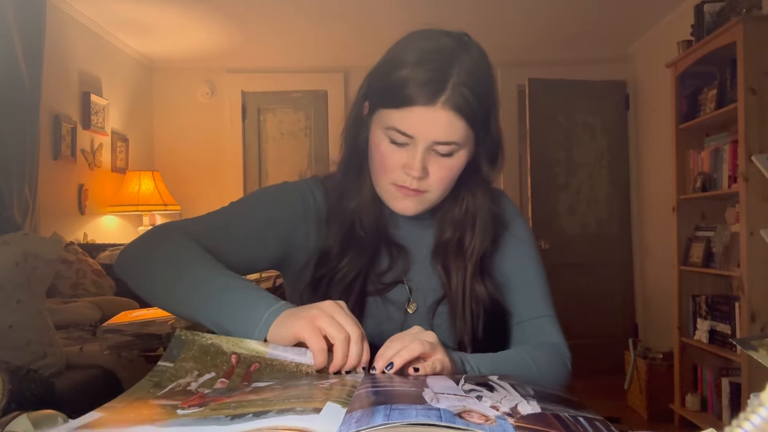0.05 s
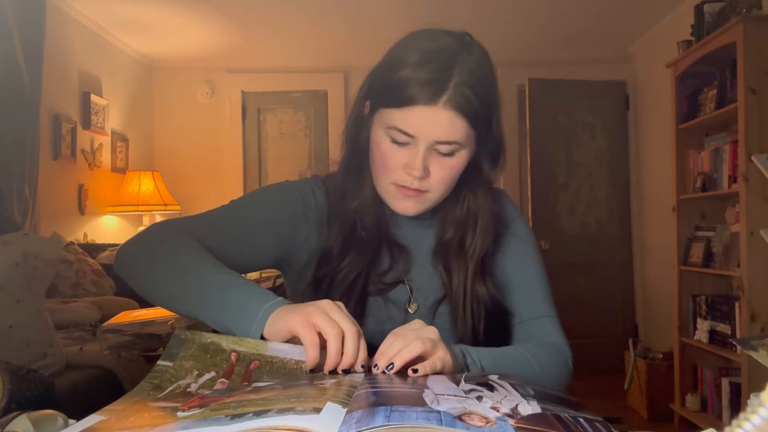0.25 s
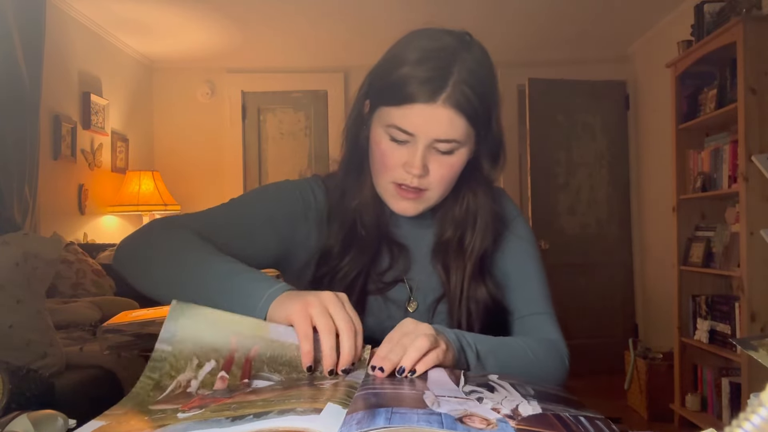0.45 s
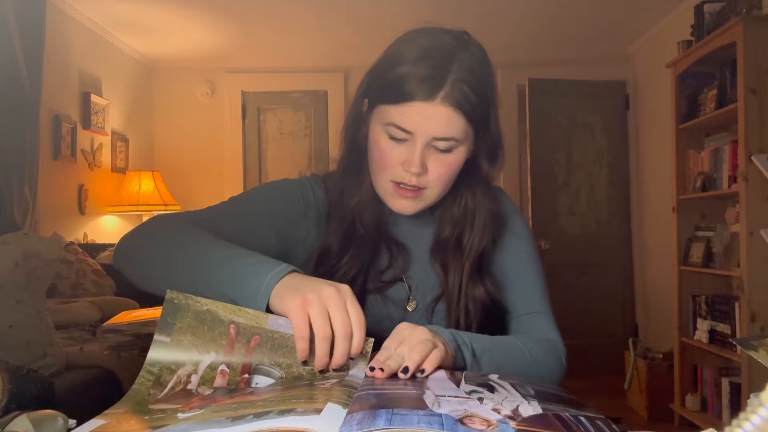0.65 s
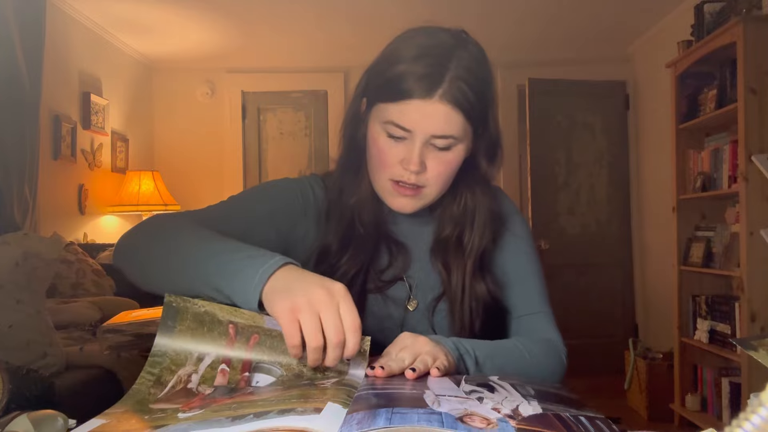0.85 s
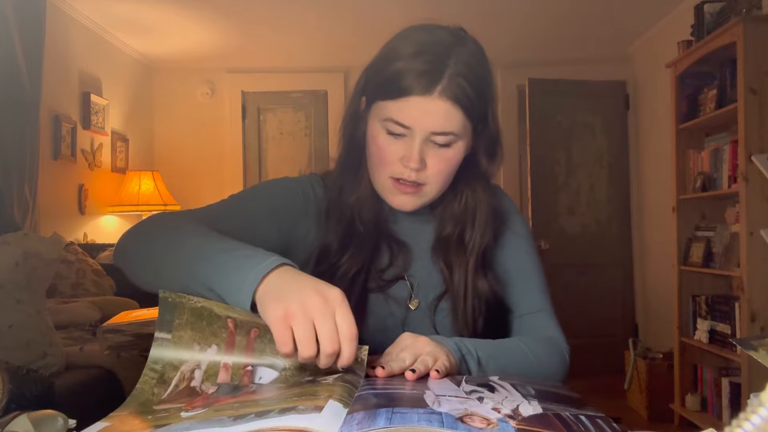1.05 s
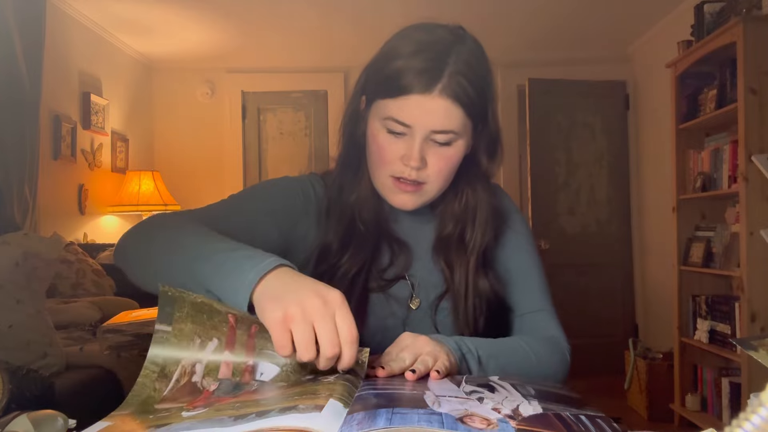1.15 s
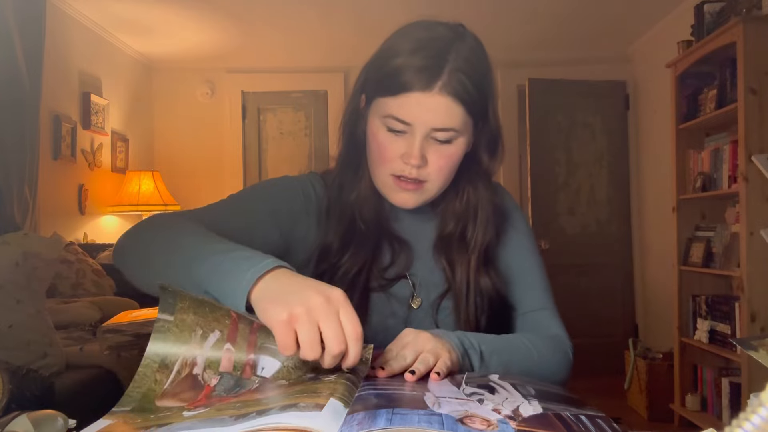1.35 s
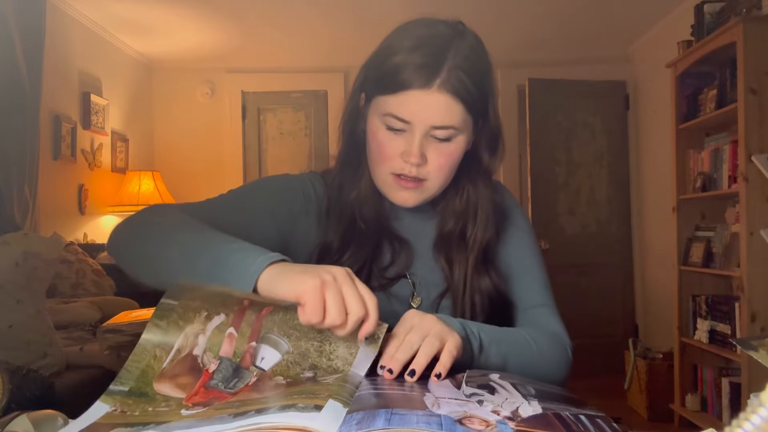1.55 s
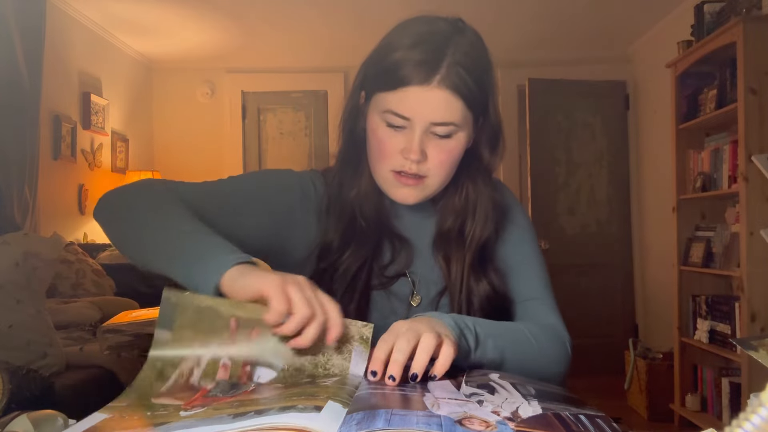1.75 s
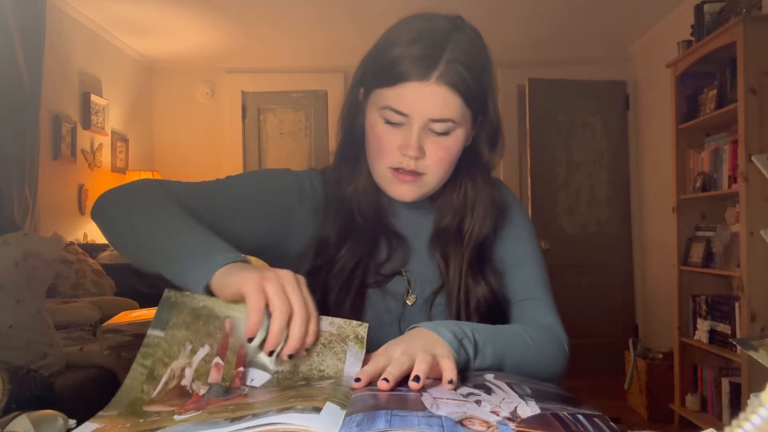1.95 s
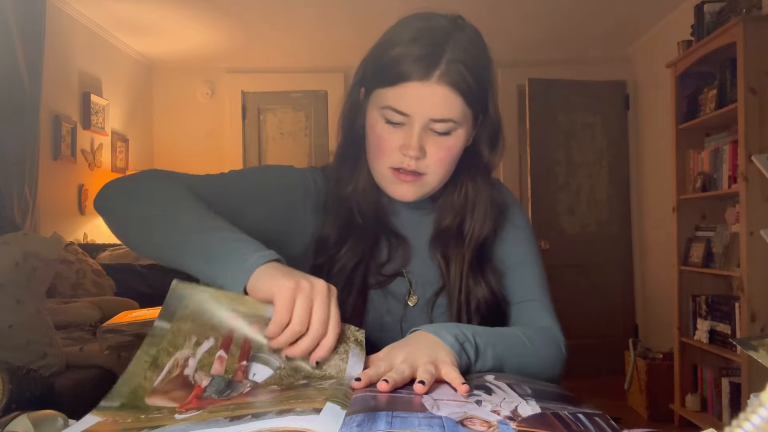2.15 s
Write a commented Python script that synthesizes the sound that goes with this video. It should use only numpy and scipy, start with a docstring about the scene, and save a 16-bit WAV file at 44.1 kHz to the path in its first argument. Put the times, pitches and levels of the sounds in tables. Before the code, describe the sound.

A glossy magazine page is torn out, then rustles and flaps softly.

```python
"""At a table in a small room, a glossy magazine page is torn out by hand.
The sheet buckles and gives in short rips, then the tear runs along the spine: each snapping fibre
is an impulse that rings the loose flap, whose resonance falls as it grows. The freed page slides
(friction noise) and flexes (bending waves) over the pages below. A short reverberation and a low
room tone lie behind it. Levels in the tables are relative, each table on its own scale."""
import sys
import numpy as np
from scipy import signal
from scipy.fft import rfft, irfft, next_fast_len
from scipy.io import wavfile
from scipy.ndimage import uniform_filter1d, map_coordinates

SR = 44100
rng = np.random.default_rng(int(sys.argv[2]) if len(sys.argv) > 2 else 0)


def output_pcm(signal):
    """Save a mono or channel-first signal as 16-bit PCM at the path in sys.argv[1].

    Samples are clipped to [-1, 1] before scaling.
    """
    pcm = np.clip(np.atleast_2d(signal).T, -1, 1) * 32767
    wavfile.write(sys.argv[1], SR, np.round(pcm).astype(np.int16))


N = 97020  # 2.2 s


def amp(db):
    """Amplitude ratio of a level in decibels."""
    return 10 ** (np.asarray(db) / 20)


def unit(x):
    """Normalisation to rms 1."""
    return x / np.sqrt(np.mean(x ** 2) + 1e-20)


def along(points, hz):
    """Interpolation of (f/Hz, value) points on a logarithmic frequency axis."""
    f, values = np.transpose(points)
    return np.interp(np.log(hz + 1), np.log(f + 1), values)


def envelopes(rows, fade_s=0.0075):
    """Amplitude envelope of each level column, dying exponentially outside the table's times."""
    times, *levels = np.transpose(rows)
    t = np.arange(N) / SR
    gate = np.exp(-np.abs(t - np.clip(t, times[0], times[-1])) / fade_s)
    return [gate * amp(np.interp(t, times, db)) for db in levels]


def filtered(x, response):
    """Linear filtering: the spectrum is multiplied by a frequency response."""
    size = next_fast_len(N + SR // 2)
    return irfft(rfft(x, size) * response(np.fft.rfftfreq(size, 1 / SR)), size)[..., :N]


def coloured(x, points, size=4096):
    """Minimum-phase filtering that conserves the power of white noise."""
    magnitude = unit(amp(along(points, np.fft.rfftfreq(size, 1 / SR))))
    cepstrum = irfft(np.log(magnitude))
    cepstrum[1:size // 2] *= 2  # folding onto positive time makes the filter causal
    cepstrum[size // 2 + 1:] = 0
    return signal.fftconvolve(x, irfft(np.exp(rfft(cepstrum))))[:N]


def split(x, edge_hz=4500):
    """Complementary crossover: the bands below and above the edge."""
    low = filtered(x, lambda hz: 1 / (1 + (hz / edge_hz) ** 10))
    return low, x - low


def wobble(per_s):
    """Smooth random modulation: a spline through per_s Gaussian values a second."""
    return map_coordinates(rng.standard_normal(int(N * per_s / SR) + 4), [np.arange(N) * per_s / SR])


def gritty(per_s, rough_db):
    """Random amplitude modulation gathers white noise into clumps."""
    return unit(rng.standard_normal(N) * amp(rough_db * wobble(per_s)))


def add(track, start_s, x):
    """Superposition of x on the track from a given time."""
    part = track[int(start_s * SR):][:len(x)]
    part += x[:len(part)]


def burst(decay_s, rise_s=0.00013, rough_db=3):
    """Acoustic emission: a cluster of tiny fractures gives exponentially decaying noise."""
    t = np.arange(SR // 10) / SR
    envelope = np.exp(-t / decay_s) * (1 - np.exp(-t / rise_s))
    clumps = amp(rough_db * unit(uniform_filter1d(rng.standard_normal(len(t)), size=24)))
    return unit(envelope * clumps * rng.standard_normal(len(t))) * np.sqrt(np.mean(envelope ** 2))


# Likeness of left and right in the room's field: f/Hz, coherence
COHERENCE = [(100, 0.85), (400, 0.49), (1500, 0.029), (4000, 0), (16000, 0)]
def diffuse(x):
    """Diffuse-field coherence: two independent signals become alike at long wavelengths."""
    angle = lambda hz: np.arccos(np.clip(along(COHERENCE, hz), -1, 1)) / 2
    mid, side = filtered(x, lambda hz: np.array([np.cos(angle(hz)), np.sin(angle(hz))]))
    return np.array([mid + side, mid - side])


# Spectrum of the background: f/Hz, level/dB
ROOM_TONE = [(20, -43), (32, 2.5), (42, 1.5), (65, -7), (110, -8), (200, -19.5), (400, -17), (1000, -35),
             (4000, -31.5), (16000, -91)]
def room_tone():
    """Ambient noise: a steady diffuse field, strongest in the bass."""
    noise = diffuse(rng.standard_normal((2, N)))
    return unit(filtered(noise, lambda hz: amp(along(ROOM_TONE, hz))))


# Reverberation time of the furnished room: f/Hz, T60/s
ROOM_T60 = [(150, 0.39), (500, 0.15), (1200, 0.18), (4000, 0.24), (14000, 0.12)]
# Colour of the reflections: f/Hz, gain/dB
ROOM_COLOUR = [(100, -4), (500, -2), (1200, 1.5), (3000, 3), (16000, 1)]
def reverberation(x, first_wall_s=0.0041, gain_db=-10.5):
    """Reflections decay exponentially; the impulse response changes as the page moves."""
    wet, t = np.zeros((2, N)), np.arange(N) / SR
    moments, step_s = np.linspace(0, N / SR, num=12, retstep=True)
    for moment in moments:
        hz, age, spectra = signal.stft(rng.standard_normal((2, SR // 2)), SR, nperseg=256)
        decay = amp(-60 * age / along(ROOM_T60, hz)[:, None])
        tail = signal.istft(spectra * decay, SR, nperseg=256)[1]
        tail *= np.arange(tail.shape[1]) / SR > first_wall_s
        crossfade = np.sqrt(np.clip(1 - np.abs(t - moment) / step_s, 0, 1))
        wet += signal.fftconvolve((crossfade * x)[None], tail / np.linalg.norm(tail[0]), axes=1)[:, :N]
    return amp(gain_db) * diffuse(filtered(wet, lambda hz: amp(along(ROOM_COLOUR, hz))))


# Share of the sound that wanders between the channels: f/Hz, level/dB
SCATTER = [(100, -37), (600, -6.5), (1500, -15.5), (2800, 0), (5000, -7.5), (8000, -5.5), (16000, -24)]
# Lead of the left channel over the right: f/Hz, phase/rad
LEFT_LEAD = [(100, 0), (700, .35), (2100, .45), (2900, -.5), (4500, -1.3), (7000, -.3), (8000, 1),
             (9200, 3.1), (11500, 6.1), (12800, 6.5), (14200, 9.2), (16000, 10.2)]
# Excess of the left channel over the right: f/Hz, level/dB
LEFT_EXCESS = [(100, -1), (300, -1), (700, 3), (1300, 2), (2400, 6), (4400, 2), (8000, 0)]
def placed_in_room(x):
    """Phase and level cues set the page a little to the left, radiating from ever different spots."""
    sides = np.array([[0.5], [-0.5]])
    position = unit(np.tanh(2 * wobble(per_s=500)))
    wander = filtered(x * position, lambda hz: 1j * amp(along(SCATTER, hz)))
    direct = filtered(x + 2 * sides * wander, lambda hz: np.exp(1j * sides * along(LEFT_LEAD, hz)))
    return filtered(direct + reverberation(x), lambda hz: amp(sides * along(LEFT_EXCESS, hz)))


# Rubbing of the gripped page before the tear: t/s, body level/dB, treble level/dB
GRIP_RUB = [(0, -40.5, -36.5), (.04, -68, -50.5), (.08, -79, -63), (.115, -67, -69), (.125, -56.5, -62),
            (.17, -54.5, -60), (.2, -56, -55), (.235, -45, -53.5), (.268, -44, -46.5), (.305, -57, -59),
            (.37, -51, -42), (.41, -78, -61), (.48, -74, -51.5), (.52, -35.5, -39), (.545, -49, -47),
            (.61, -56, -45)]
# Rubbing of the freed page: t/s, body level/dB, treble level/dB
FREED_RUB = [(1.3, -56, -72), (1.33, -59, -69), (1.376, -50.5, -53), (1.47, -47.5, -59),
             (1.508, -38.5, -40), (1.56, -51, -57.5), (1.698, -46, -53), (1.716, -52, -57),
             (1.742, -41, -51), (1.772, -35, -44), (1.818, -35.5, -44.5), (1.88, -45, -50.5),
             (1.96, -45, -49.5), (2.076, -48.5, -55.5), (2.082, -40.5, -53.5), (2.128, -47.5, -53),
             (2.184, -53.5, -55), (2.2, -29, -37.5)]
# Spectrum of the rubbing: f/Hz, level/dB
RUB_COLOUR = [(290, -10), (500, -4.5), (700, -4.5), (950, 3), (1300, -5), (2000, -0.5), (3000, -7.5),
              (5000, -11.5), (8000, -24), (12500, -22.5), (16000, -19.5)]
def friction(rows, gain_db):
    """Sliding friction of glossy paper on paper radiates slightly grainy broadband noise."""
    body_gain, treble_gain = envelopes(rows)
    body, treble = split(coloured(gritty(per_s=430, rough_db=1.5), RUB_COLOUR))
    return amp(gain_db) * (body_gain * unit(body) + treble_gain * unit(treble))


# Flutter of the held sheet: t/s, level/dB
HELD_FLUTTER = [(0, -42.5), (.1, -93), (.19, -57), (.28, -51.5), (.33, -55), (.47, -46.5), (.6, -45.5),
                (.65, -32), (.71, -42.5), (.99, -48), (1.12, -40), (1.19, -48.5), (1.24, -51.5), (1.3, -60)]
# Flapping of the freed sheet: t/s, bass level/dB, low-middle level/dB
FREED_FLUTTER = [(1.3, -81, -71), (1.345, -65, -53), (1.379, -64, -43.5), (1.45, -66, -51),
                 (1.515, -49.5, -63), (1.56, -58, -50), (1.62, -55, -50), (1.675, -46.5, -47),
                 (1.74, -58, -48.5), (1.816, -34, -28.5), (1.85, -43, -42), (1.895, -43, -36),
                 (1.92, -42, -54), (2.0, -47, -51.5), (2.07, -50, -57), (2.105, -40, -48), (2.2, -51, -43)]
# Spectrum of the flexing sheet: f/Hz, level/dB
FLUTTER_COLOUR = [(40, -13), (90, -9), (170, -0.5), (230, -8.5), (290, 0.5), (390, -1), (480, -3.5),
                  (700, -8), (1200, -9.5), (3000, -75)]
def flutter(freed_db=-3.5):
    """Flexural vibration of the sheet, first held and then free, radiates low, uneven noise."""
    flexing = unit(coloured(gritty(per_s=70, rough_db=3.5), FLUTTER_COLOUR))
    bass, middle = split(flexing, edge_hz=165)
    bass_gain, middle_gain = envelopes(FREED_FLUTTER)
    freed = bass_gain * unit(bass) + middle_gain * unit(middle)
    return envelopes(HELD_FLUTTER)[0] * flexing + amp(freed_db) * freed


# Soft creases of the loose page: t/s, level/dB, decay time/s
CREASES = [(1.261, -27, 0.0017), (1.505, -24.5, 0.0071), (1.71, -27, 0.013), (1.773, -20.5, 0.0057),
           (1.819, -20, 0.0045), (1.835, -30.5, .004), (1.928, -25.5, 0.0021), (1.965, -20.5, 0.005),
           (2.0826, -20, 0.0037), (2.176, -21.5, 0.0021)]
# Spectrum of a crease: f/Hz, level/dB
CREASE_COLOUR = [(100, -2.5), (400, 7), (900, 4.5), (1900, 4), (3000, -16.5), (6000, -29), (16000, -44)]
def creases(gain_db=-5):
    """Local yielding: each crease of the page emits a dull noise burst."""
    track = np.zeros(N)
    for start, db, decay_s in CREASES:
        add(track, start, amp(db + gain_db) * burst(decay_s, rise_s=0.00029, rough_db=2.5))
    return coloured(track, CREASE_COLOUR)


# Buckling of the sheet: t/s, level/dB, final f/Hz, downward sweep/Hz, decay time/s
BUCKLES = [(0.2068, -21, 260, 1000, 0.0027), (0.493, -34, 227, 600, 0.0082), (0.583, -32, 128, 900, 0.006),
           (.586, -21.5, 284, 200, 0.0077), (0.6212, -23.5, 224, 1010, 0.0062),
           (0.628, -30.5, 153, 198, 0.018), (0.6489, -20.5, 390, 830, 0.0071),
           (0.777, -32, 356, 315, 0.0073), (1.517, -36.5, 203, 510, 0.0094), (1.591, -37.5, 112, 50, 0.022),
           (1.899, -27, 325, 300, 0.0026), (1.928, -29, 493, 298, 0.0047), (2.107, -33, 281, 300, 0.01),
           (2.151, -33.5, 246, 300, 0.0039)]
def buckles(sweep_s=0.0011, gain_db=3):
    """Dispersion: high bending waves arrive first, so each buckle is a falling chirp."""
    track, t = np.zeros(N), np.arange(SR // 10) / SR
    for start, db, hz, sweep_hz, decay_s in BUCKLES:
        cycles = hz * t + sweep_hz * sweep_s * (1 - np.exp(-t / sweep_s))
        add(track, start, amp(db + gain_db) * np.sin(2 * np.pi * cycles) * np.exp(-t / decay_s))
    return track


def ringing(x, ring_hz, ring_db=7, width_hz=650):
    """Resonances of the stretched paper colour a burst while its power is kept."""
    rings = sum(signal.lfilter(*signal.iirpeak(hz, hz / width_hz, SR), x) for hz in ring_hz)
    return unit(x + amp(ring_db) * rings) * np.std(x)


# Short rips: t/s, level/dB, treble gain/dB, decay time/s, lower ring f/Hz, upper ring f/Hz
RIPS = [(0.2043, -19, -3, 0.0015, 990, 5900), (0.3152, -24.5, 1.5, 0.0037, 3750, 4840),
        (0.3503, -28.5, 0, 0.0077, 2600, 4570), (0.358, -17, -2, 0.0034, 2650, 4400),
        (0.4205, -26, 4.5, 0.0022, 2100, 4700), (0.425, -20.5, -3, 0.0026, 3420, 7900),
        (0.449, -29.5, -7, 0.0057, 2400, 3040), (0.488, -20, -4, 0.002, 4800, 5600),
        (0.4902, -16.5, 1, 0.0028, 1990, 5300), (0.4993, -15, 2, 0.0036, 2170, 4850),
        (0.504, -21, -6, 0.0033, 2080, 7430), (0.517, -18, -5, 0.0025, 2070, 5000),
        (.5538, -14.5, -4, 0.0021, 2000, 12300), (0.5585, -13.5, 0, 0.002, 4960, 12000),
        (0.58, -8, 1.5, 0.0024, 1150, 4850), (0.619, -11, -6.5, 0.0057, 2580, 4800),
        (0.625, -17, -10, 0.0036, 550, 2500), (0.639, -8.5, 0, 0.0028, 3000, 7950),
        (0.641, -9.5, -12, 0.0018, 3060, 4370), (0.6491, -11, 1, 0.004, 3000, 5400),
        (0.6616, -16, -10, 0.0012, 1300, 2830), (0.6685, -15, -12, 0.0028, 2740, 4700)]
# Colour common to all rips: f/Hz, gain/dB
RIP_COLOUR = [(150, -18), (500, 4), (1100, -6.5), (2000, 1), (3300, -3.5), (5000, -0.5), (6500, -5),
              (8000, -10.5), (12000, -6.5), (16000, -8.5)]
def rips(crack_db=4, gain_db=-5):
    """Intermittent fracture: the binding gives in steps, each with its own crack and resonances."""
    body, treble = np.zeros((2, N))
    for start, db, treble_db, decay_s, *ring_hz in RIPS:
        fracture = burst(decay_s, rise_s=0.00023)
        fracture[0] += amp(crack_db)
        rip = amp(db) * ringing(fracture, ring_hz)
        add(body, start, rip)
        add(treble, start, amp(treble_db) * rip)
    return amp(gain_db) * coloured(split(body)[0] + split(treble)[1], RIP_COLOUR)


# Fibre bundles snapping along the tear: t/s, level/dB, ring f/Hz
SNAPS = [(0.6864, -7.5, 2650), (0.709, -13, 2220), (0.718, -6.5, 2170), (0.7307, -9, 2910),
         (0.7402, -8.5, 1450), (0.7522, -9.5, 2480), (0.753, -11, 2230), (0.778, -15, 2650),
         (0.7847, -12.5, 1380), (0.7983, -21, 1600), (0.807, -22, 1700), (0.8208, -7.5, 2110),
         (0.8253, -9, 1750), (0.8444, -16.5, 2030), (0.862, -17.5, 2100), (0.871, -6.5, 1990),
         (0.9102, -12, 2260), (0.912, -8, 1680), (0.9234, -16, 1680), (0.9395, -14, 1980),
         (0.9445, -14.5, 1390), (0.956, -19, 2020), (0.975, -18, 2010), (1.0096, -7.5, 1570),
         (1.0216, -7.5, 1990), (1.0326, -15, 2030), (1.0668, -15.5, 1600)]
# Last fibres letting go: t/s, level/dB
TICKS = [(1.0672, -27), (1.124, -30), (1.164, -27), (1.2026, -30.5), (1.2253, -30.5), (1.245, -40.5),
         (1.369, -46), (1.379, -37), (1.406, -43)]
# Spectrum of the cracks and ticks: f/Hz, level/dB
CRACK_COLOUR = [(1000, -17), (3500, -4), (8000, -8), (12500, -1.5), (16000, 7.5)]
def snaps(decay_s=0.00081, overtone_ratio=2.17, ring_db=-3, crack_db=-7.5, tick_db=7.5):
    """Impulse excitation: a bundle cracks and rings two damped flap modes; the last fibres only tick."""
    rings, cracks = np.zeros((2, N))
    t = np.arange(SR // 50) / SR
    for start, db, hz in SNAPS:
        modes = np.sin(2 * np.pi * hz * t) + amp(-13.5) * np.sin(2 * np.pi * overtone_ratio * hz * t)
        ring = modes * np.exp(-t / decay_s) * (1 - np.exp(-t / 0.000095))
        add(rings, start, amp(db + ring_db) * ring / np.abs(ring).max())
        add(cracks, start, amp(db + crack_db) * burst(decay_s=0.0017))
    for start, db in TICKS:
        add(cracks, start, amp(db + tick_db) * burst(decay_s=0.0021))
    return rings + coloured(cracks, CRACK_COLOUR)


def clicks(per_s, spread_db):
    """Shot noise: single impulses of random time, sign and size."""
    chance, size = rng.random(N), rng.standard_normal(N)
    return unit((chance < per_s / SR) * rng.choice([-1, 1], N) * amp(spread_db * np.minimum(size, 2)))


# Resonance of the growing flap: t/s, f/Hz
FLAP_RESONANCE = [(.62, 2880), (.76, 2130), (1.0, 1630), (1.3, 1377)]
def crackle(start_s, end_s, per_s=900, count=2500, pitch_spread=0.38, spread_db=5, decay_cycles=1.03):
    """Fibres part as a Poisson process, each ringing the flap; rms is 1 from start_s to end_s."""
    times = start_s + np.cumsum(rng.exponential(size=count)) / per_s
    detuning = np.exp(pitch_spread * rng.standard_normal(count))
    hz = np.interp(times, *np.transpose(FLAP_RESONANCE)) * detuning
    sizes = amp(spread_db * np.minimum(rng.standard_normal(count), 2))
    offsets = np.arange(SR // 200)
    cycles = hz[:, None] * offsets / SR
    rings = sizes[:, None] * np.sin(2 * np.pi * cycles) * np.exp(-cycles / decay_cycles)
    samples = (times * SR).astype(int)[:, None] + offsets
    track = np.bincount(samples.ravel(), rings.ravel(), N)[:N]
    return track / np.std(track[int(start_s * SR):int(end_s * SR)])


# Course of the running tear: t/s, crackle and body level/dB, rasp level/dB, hiss level/dB
TEAR = [(.62, -29, -33, -27), (.645, -26.5, -37, -27.5), (.69, -36.5, -37, -33.5), (.74, -26, -33, -39.5),
        (.775, -33, -32, -35), (.82, -30, -48, -34), (.855, -31.5, -40, -31), (.9, -36.5, -40.5, -35.5),
        (.925, -34.5, -33.5, -26.5), (.97, -30.5, -49, -37), (1.002, -44, -52, -47),
        (1.025, -30.5, -55, -40), (1.08, -39.5, -50, -39), (1.14, -47, -51.5, -41),
        (1.24, -50.5, -57, -51.5), (1.3, -57, -72, -66)]
# Spectrum of the fibre noise: f/Hz, level/dB
TEAR_COLOUR = [(290, -20), (500, -2), (800, -0.5), (1100, 10), (1400, -14.5), (2000, 3), (2800, 3.5),
               (3600, -9.5), (5000, -10), (6500, -16), (8000, -14.5), (10000, -14), (12500, -15),
               (16000, -12)]
def tear(clicks_db=-5, crackle_db=-1, body_db=-5, hiss_db=-1.5, tug_db=1.5):
    """Crack propagation: parting fibres crackle and rasp in uneven tugs under a gritty hiss."""
    low_gain, rasp_gain, hiss_gain = envelopes(TEAR, fade_s=0.0029)
    fibres = gritty(per_s=700, rough_db=3.5) + amp(clicks_db) * clicks(per_s=780, spread_db=4.5)
    body, treble = split(coloured(fibres, TEAR_COLOUR), edge_hz=3600)
    rasp, hiss = split(treble, edge_hz=6000)
    flap = split(crackle(TEAR[0][0], TEAR[-1][0]), edge_hz=750)[1]
    tugs = unit(amp(tug_db * wobble(per_s=220)))
    low = low_gain * (amp(crackle_db) * flap + amp(body_db) * unit(body))
    return tugs * (low + rasp_gain * unit(rasp)) + hiss_gain * amp(hiss_db) * unit(hiss)


def scene():
    """Superposition: fracture, bending and friction of the page sound in the room over its low tone."""
    fracture = rips() + snaps() + tear()
    bending = buckles() + creases() + flutter()
    rubbing = friction(GRIP_RUB, gain_db=-2.5) + friction(FREED_RUB, gain_db=0.5)
    return placed_in_room(fracture + bending + rubbing) + amp(-52) * room_tone()


# Frequency response of the microphone: f/Hz, gain/dB
MICROPHONE = [(100, 0), (6000, -1.5), (8300, 5), (9500, -4.5), (10800, 0.5), (13000, -2), (14500, 1),
              (15700, -2.5)]
def record(dry, low_hz=36, top_hz=16000):
    """A high-pass near 36 Hz removes the slow offset below the sound and the treble ends at 16 kHz; the
    microphone's treble response is uneven."""
    passband = lambda hz: (hz < top_hz) * (1 - 1 / (1 + (hz / low_hz) ** 6))
    return filtered(dry, lambda hz: amp(along(MICROPHONE, hz)) * passband(hz))


dry = scene()
out = record(dry)
output_pcm(out)
```